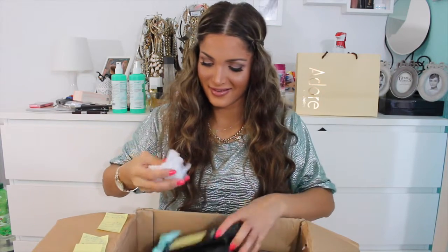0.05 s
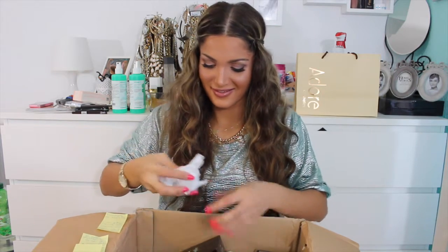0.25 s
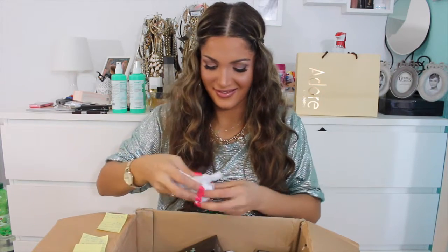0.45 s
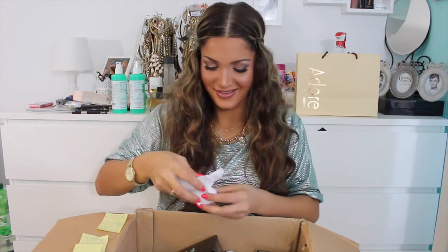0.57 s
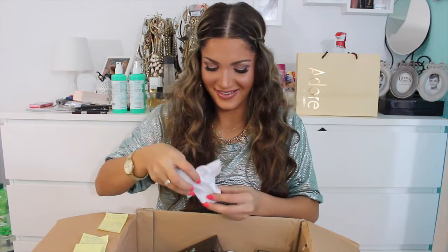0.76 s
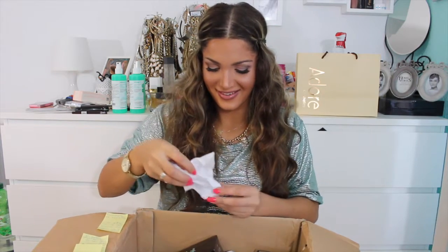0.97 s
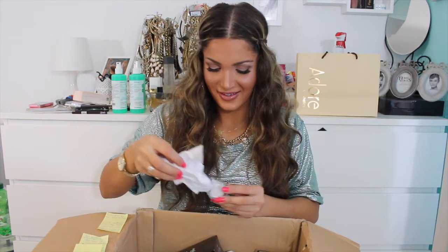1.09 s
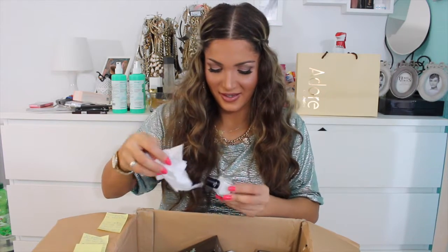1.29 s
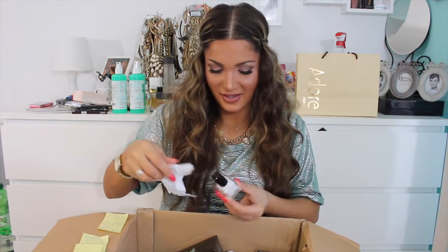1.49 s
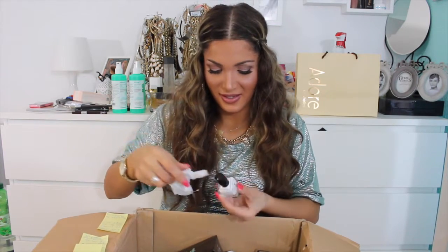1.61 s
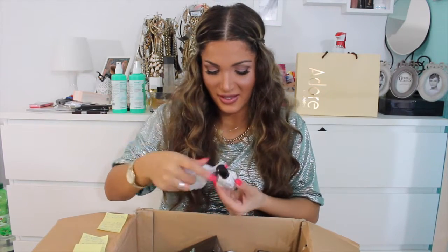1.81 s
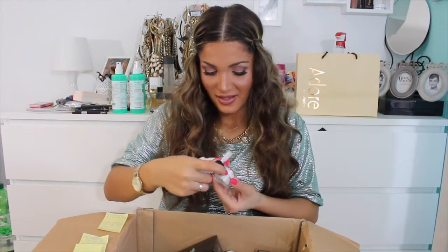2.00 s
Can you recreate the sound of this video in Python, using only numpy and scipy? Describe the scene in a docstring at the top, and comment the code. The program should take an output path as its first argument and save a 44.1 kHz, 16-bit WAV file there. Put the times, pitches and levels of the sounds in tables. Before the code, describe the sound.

Tissue paper rustles in two long strokes, with a few crisp snaps, as it is pulled off a little bottle. Just before, a small box drops into a cardboard carton with a hollow knock. A furnished room, with faint hum and hiss.

```python
"""A small gift box is laid into a cardboard carton: it scuffs, ticks on the rim and, a quarter second in,
drops with a knock that rings hollow in carton and room. Then tissue paper is crumpled and
pulled off a little bottle in two long strokes: thousands of tiny buckles blur into a rustle, and a few
creases snap out alone. A furnished room answers it all, over a faint hum and hiss of room and camera."""
import sys
import numpy as np
from scipy import signal
from scipy.fft import rfft, irfft, next_fast_len
from scipy.io import wavfile
from scipy.ndimage import map_coordinates

SR = 44100
rng = np.random.default_rng(int(sys.argv[2]) if len(sys.argv) > 2 else 0)


def waveform_to_disk(signal):
    """Save audio, clipped to [-1, 1], as 16-bit WAV at the path in sys.argv[1]."""
    frames = np.transpose(np.atleast_2d(signal))
    scaled = np.clip(frames, -1, 1) * 32767
    samples = np.round(scaled).astype(np.int16)
    wavfile.write(sys.argv[1], SR, samples)


N = 90404
CLICK_SAMPLES = SR // 50
PAPER_WET_DB = 1


def amp(db):
    return 10 ** (np.asarray(db) / 20)


def unit_rms(x):
    return x / np.sqrt(np.mean(x ** 2) + 1e-20)


def curve_at(points, hz):
    """Read a curve of (frequency, value) points on a log frequency axis."""
    point_hz, values = np.transpose(points)
    return np.interp(np.log(hz + 1), np.log(point_hz + 1), values)


def wobble(rate_hz):
    """A smooth random drift through rate_hz points a second."""
    knots = rng.standard_normal(int(N * rate_hz / SR) + 4)
    return map_coordinates(knots, [np.arange(N) * rate_hz / SR])


def equalize(x, gain_at):
    """Shape the tone with a gain that depends on frequency."""
    size = next_fast_len(x.shape[-1] + 8192)
    gain = gain_at(np.fft.rfftfreq(size, 1 / SR))
    return irfft(rfft(x, size) * gain, size)[..., :x.shape[-1]]


def stereo(pair):
    """Two unrelated signals become left and right, most alike in the midrange."""
    # How alike the two sides are: frequency_hz, correlation
    likeness = [(60, 0.1), (125, 0.3), (250, 0.57), (550, 0.69), (1650, 0.8), (4970, 0.44), (9000, 0.23),
                (15000, .2)]

    def mid_side_gains(hz):
        angle = np.arccos(np.clip(curve_at(likeness, hz), 0, 1)) / 2
        return np.array([np.cos(angle), np.sin(angle)])

    mid, side = equalize(pair, mid_side_gains)
    return np.array([mid + side, mid - side])


def room(x, pieces):
    """The room's tail, each frequency dying at its own speed; a new tail for each piece of time."""
    # Decay of the furnished room: frequency_hz, t60_s
    decay = [(150, 0.57), (400, 0.39), (1000, 0.4), (2800, 0.91), (7000, 0.71), (14000, 0.54)]
    reverb, step = np.zeros((2, N + SR)), -(-N // pieces)
    for start in range(0, N, step):
        hz, t, noise = signal.stft(rng.standard_normal((2, SR // 2)), SR, nperseg=256)
        fade = amp(-60 * t / curve_at(decay, hz)[:, None])
        tail = signal.istft(noise * fade, SR, nperseg=256)[1]
        wet = signal.fftconvolve(x[None, start:start + step], tail / np.linalg.norm(tail[0]), axes=1)
        at = start + 130  # 3 ms pre-delay
        reverb[:, at:at + wet.shape[1]] += wet
    return stereo(reverb[:, :N])


def click(hz, decay_cycles):
    """A pitched tick that dies within a few cycles."""
    cycles = np.arange(CLICK_SAMPLES) / SR * hz
    return np.sin(2 * np.pi * cycles) * np.exp(-cycles / decay_cycles)


def contact_click(hz, decay_cycles):
    """Box meets cardboard: a blunt click, a noisy crack and a hard first edge, dulled together."""
    t = np.arange(CLICK_SAMPLES) / SR
    crack_db, crack_t60_s, dull_hz = -22.5, 0.012, 6700
    crack = amp(crack_db - 60 * t / crack_t60_s) * rng.standard_normal(CLICK_SAMPLES)
    edge = amp(-7) * click(hz=4000, decay_cycles=0.57)
    return signal.lfilter(*signal.butter(2, dull_hz, fs=SR), click(hz, decay_cycles) + crack + edge)


def hollow_ring():
    """The knock's hollow ring: short carton resonances, and low room resonances that swell and linger."""
    # Resonances of carton and room: pitch_hz, relative_db, t60_s, rise_s
    modes = [(187, -31, 0.42, 0.00092), (279.9, -6, 0.15, 0.0015), (313.4, 6, 0.063, 0.003),
             (340.7, 5, 0.19, 0.042), (361, 1, 0.29, 0.041), (419.2, 4.5, 0.18, 0.023),
             (521.5, -11, 0.17, 0.003), (632, -9.5, 0.19, 0.018), (837, -4, 0.076, .001),
             (905, -57, 0.27, 0.0011), (1098, -7, 0.2, 0.002), (1276, -7.5, 0.06, 0.0019),
             (1517, -13, 0.044, 0.00058)]
    t = np.arange(SR // 2) / SR
    return amp(-10) * sum(amp(db - 60 * t / t60_s) * (1 - np.exp(-t / rise_s)) * np.sin(2 * np.pi * hz * t)
                          for hz, db, t60_s, rise_s in modes)


def gift_box():
    """The box clicks against the carton and leaves a hollow ring; near walls and the room answer."""
    # Scuff, rim tick, its quick duller echo, drop:
    # start_s, click_gain_db, pitch_hz, decay_cycles, ring_gain_db
    clicks = [(.004, -28, 1490, 1.1, -32.5), (0.1909, -13, 3024, 1.33, -21.5),
              (0.1973, -21, 1060, 1, -19.5), (.2396, 1, 1074, 0.48, -3)]
    # Early reflections off near walls: delay_s, gain_db
    walls = [(.0023, -5.5), (.0066, -4.5), (0.015, -10), (0.0232, -8), (.0415, -11), (.065, -11)]
    hits, ring, hollow = np.zeros(N), np.zeros(N), hollow_ring()
    for start_s, click_db, hz, decay_cycles, ring_db in clicks:
        at = round(start_s * SR)
        hits[at:][:CLICK_SAMPLES] += amp(click_db) * contact_click(hz, decay_cycles)
        ring[at:][:len(hollow)] += amp(ring_db) * hollow
    early = sum(amp(db) * np.roll(hits, round(delay_s * SR)) for delay_s, db in walls)
    reverb = amp(3) * room(hits, pieces=10) + amp(-8.5) * room(ring, pieces=10)
    return hits + early + ring + reverb


def creases():
    """Dense little buckles of the sheet, each a short burst of its own pitch and size, in clumps."""
    creases_per_s, spread_db, decay_cycles = 7000, 2, 1.16
    when, pitch, strength = rng.random((int(creases_per_s * N / SR), 3)).T
    at = (when * N).astype(int)
    hz = 400 * 40 ** pitch[:, None]  # 400 Hz to 16 kHz
    clump_db = 2 * wobble(rate_hz=60.54) + 0.34 * wobble(rate_hz=19.85)
    size = amp(clump_db[at] - spread_db * np.log(1 - strength))  # many small, few large
    age = np.arange(200)
    cycles = age * hz / SR
    grains = size[:, None] * hz * np.sin(2 * np.pi * cycles) * np.exp(-cycles / decay_cycles)
    return np.bincount((at[:, None] + age).ravel(), grains.ravel(), N + len(age))[:N]


def paper_rustle():
    """The tissue's creases swell and fade in three bands with the strokes of the hand."""
    # Envelope of the strokes: time_s, mid_level_db, treble_over_mid_db, low_over_mid_db
    strokes = [(0.05, -44.5, -8, -0.5), (0.062, -49, -7, -20), (0.07, -62, 2, 5), (0.096, -49.5, -3, -4.5),
               (0.156, -50, -9, -10), (0.18, -47.5, 2, 4), (0.4, -51.5, -21.5, -30),
               (0.436, -42.5, -5.5, -10.5), (0.624, -43.5, -5.5, -4.5), (0.638, -40, -6.5, -6.5),
               (0.712, -42.5, -6, -11), (0.784, -38, -7, -9), (0.936, -35.5, -6, -10.5),
               (1.018, -40.5, -5, -8), (1.032, -36, -6, -11.5), (1.116, -41, -7, -5.5),
               (1.148, -47.5, -8.5, -5), (1.258, -48.5, -5.5, -8), (1.272, -48, -3.5, -5),
               (1.304, -45.5, -9, -5.5), (1.468, -36.5, -5, -9.5), (1.51, -36.5, -11, -16),
               (1.538, -38.5, -6, -12), (1.624, -38.5, -10, -11), (1.68, -44, -10.5, -13.5),
               (1.818, -53, -8.5, -8.5), (1.854, -47.5, -14.5, -12.5), (1.988, -66, -6, -4),
               (2.05, -61, -3, -1.5)]
    # Tone of the tissue: frequency_hz, gain_db
    tone = [(120, -40.5), (200, -20), (358, -15), (407, -9), (471, -12), (890, -11.5), (1280, -9),
            (3550, -4.5), (8350, -10), (15500, -21.5)]
    low_hz, treble_hz = 1500, 6000
    time_s, *envelopes = np.transpose(strokes)
    mid_db, treble_db, low_db = [np.interp(np.arange(N) / SR, time_s, db) for db in envelopes]
    sheet_halves = equalize(np.array([creases(), creases()]), lambda hz: amp(curve_at(tone, hz)))
    crackle = stereo(sheet_halves) + amp(PAPER_WET_DB) * room(sheet_halves[0], pieces=8)
    low = equalize(crackle, lambda hz: 1 / (1 + (hz / low_hz) ** 4))
    treble = equalize(crackle, lambda hz: 1 / (1 + (treble_hz / (hz + 1)) ** 6))
    mid = crackle - low - treble
    return amp(mid_db) * (unit_rms(mid) + amp(low_db) * unit_rms(low) + amp(treble_db) * unit_rms(treble))


def paper_snaps():
    """Single creases snap out of the rustle and sound in the room."""
    # Lone creases: start_s, relative_db, pitch_hz
    lone_creases = [(0.5159, -20, 2970), (0.5634, -21, 4500), (0.9395, -19, 1480), (0.9635, -30, 3010),
                    (0.972, -17, 4160), (1.0314, -19, 2700), (1.265, -28, 2310), (1.2734, -21, 4200),
                    (1.293, -23.5, 1730), (1.4598, -13.5, 4200), (1.849, -28, 1880), (1.8793, -32, 1850),
                    (0.0338, -31, 7970), (0.0957, -42, 6570), (0.1164, -48, 6300), (0.1446, -23, 7060),
                    (1.7489, -28, 8450), (1.7574, -47, 8620)]
    snaps = np.zeros(N)
    for start_s, db, hz in lone_creases:
        snaps[round(start_s * SR):][:CLICK_SAMPLES] += amp(db - 6) * click(hz, decay_cycles=1.5)
    return snaps + amp(PAPER_WET_DB) * room(snaps, pieces=8)


def room_tone():
    """The quiet hum and hiss of room and camera."""
    # Colour of the noise: frequency_hz, gain_db
    colour = [(15, -45), (28, -6), (50, -13), (70, -10), (100, 2), (125, -9), (178, -1), (224, -1),
              (300, -6), (700, -10), (1050, -11), (3170, -11), (12500, -25), (15500, -35)]
    noise = equalize(rng.standard_normal((2, N)), lambda hz: amp(curve_at(colour, hz)))
    return amp(-56) * unit_rms(stereo(noise))


def scene():
    """Paper and box, too small to radiate deep bass, over the room tone."""
    bass_cut = signal.butter(3, 160, "high", fs=SR)
    handling = paper_rustle() + paper_snaps() + gift_box()
    return signal.lfilter(*bass_cut, handling) + room_tone()


def record(dry):
    """The camera keeps nothing above its band limit."""
    return equalize(dry, lambda hz: hz < 15800)


dry = scene()
out = record(dry)
waveform_to_disk(out)
```